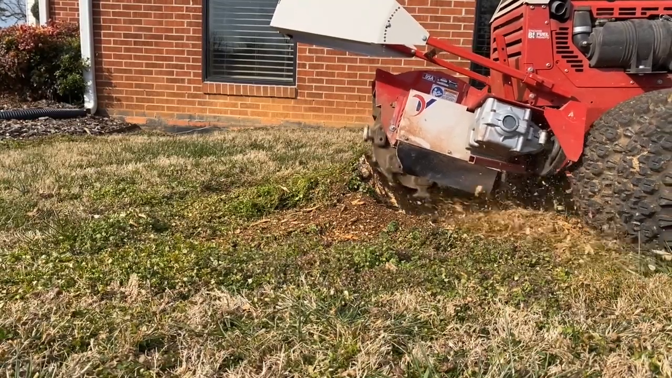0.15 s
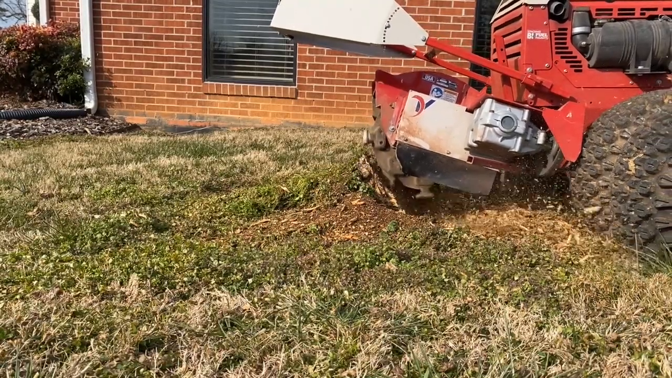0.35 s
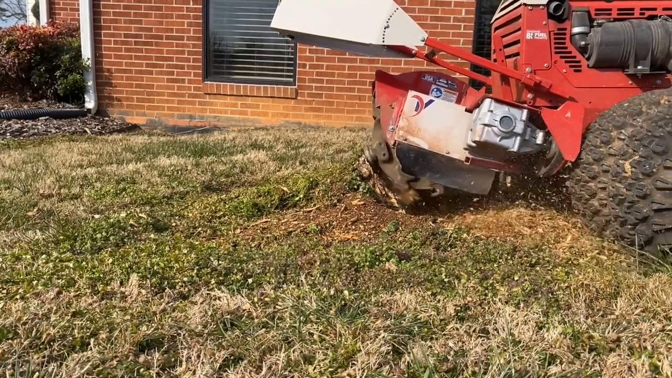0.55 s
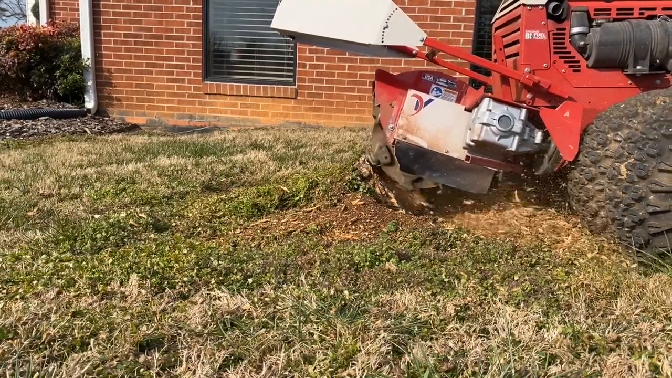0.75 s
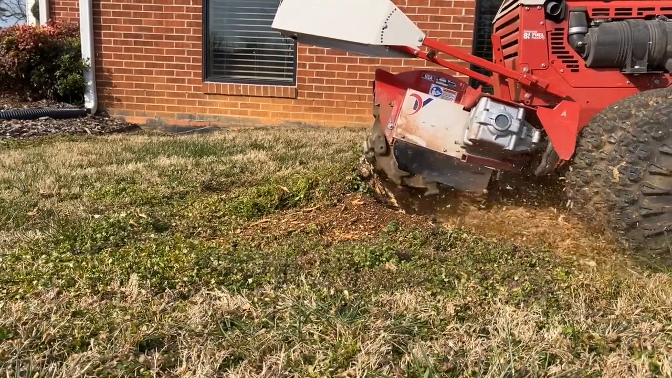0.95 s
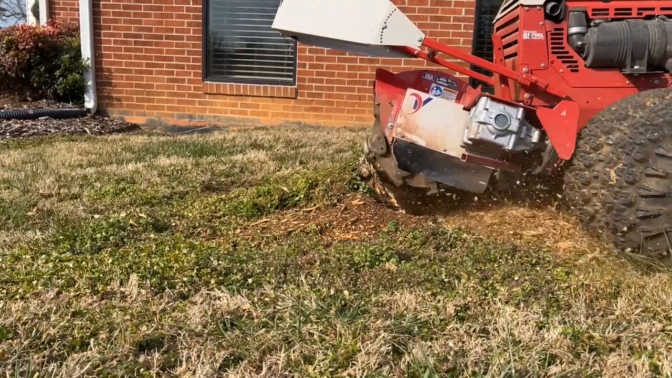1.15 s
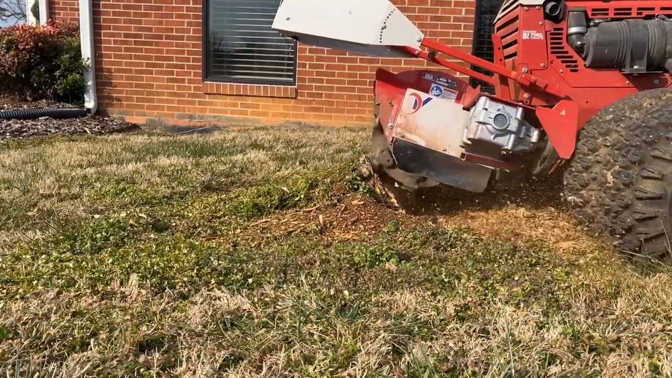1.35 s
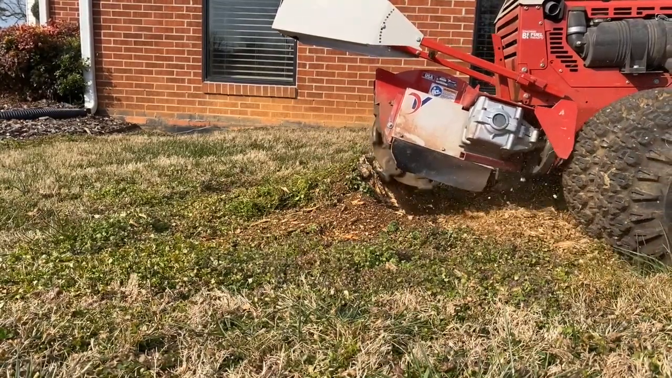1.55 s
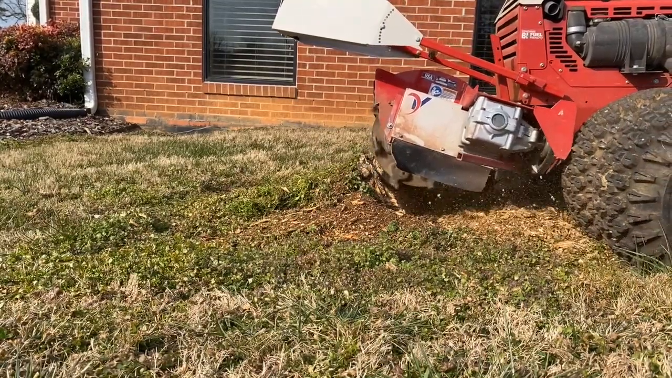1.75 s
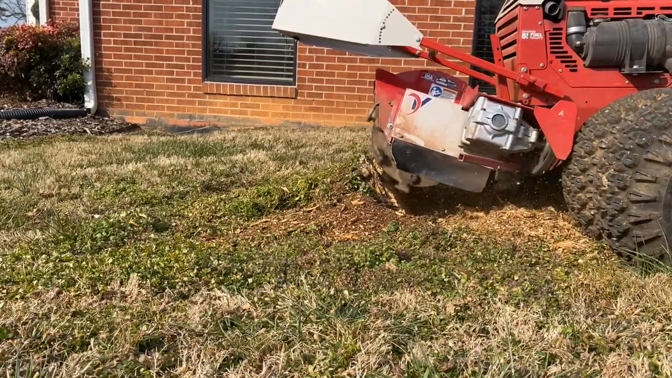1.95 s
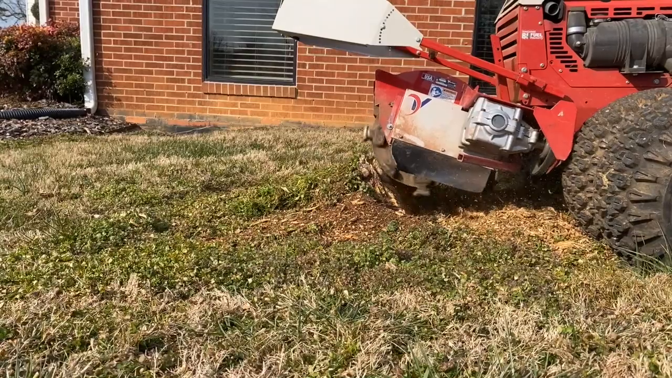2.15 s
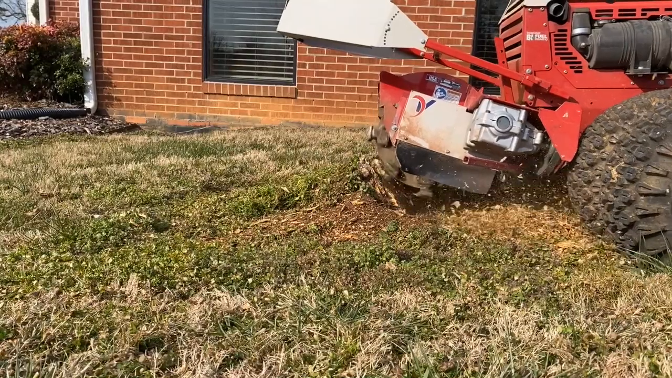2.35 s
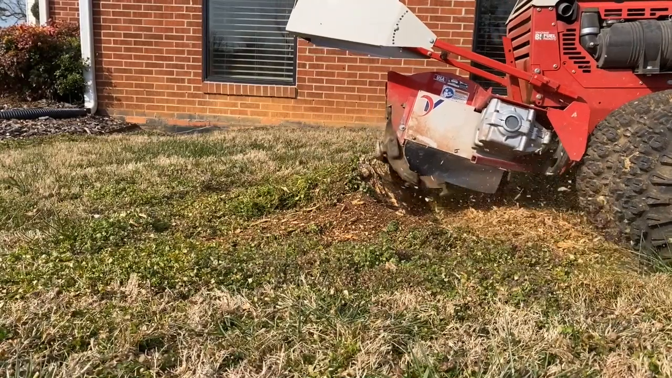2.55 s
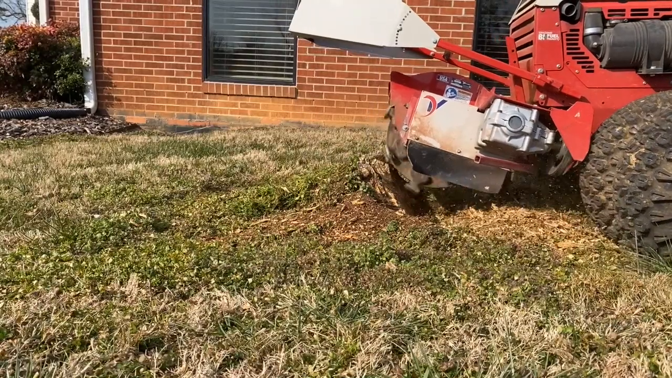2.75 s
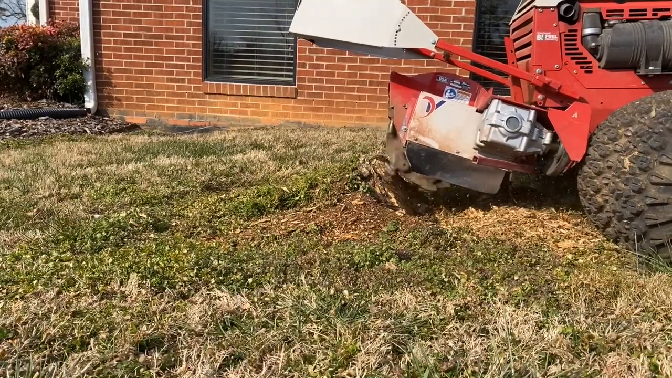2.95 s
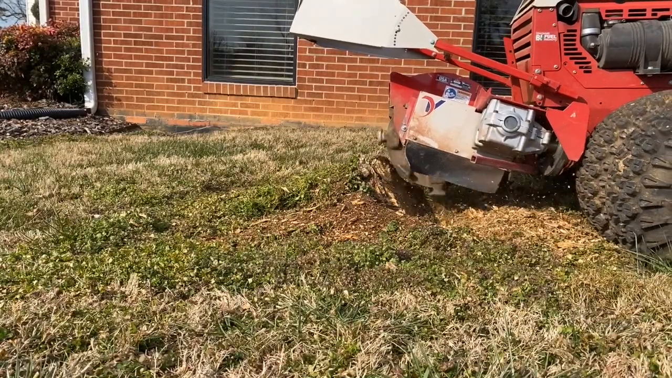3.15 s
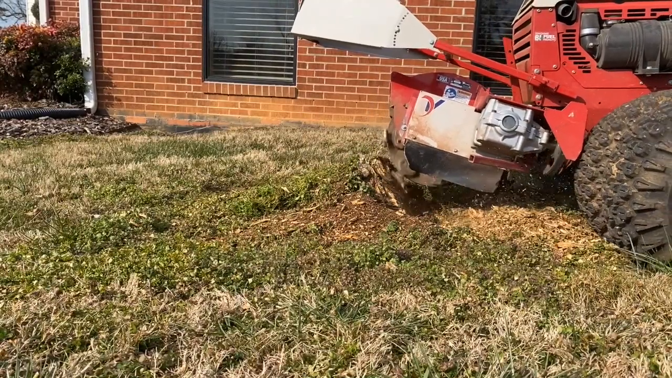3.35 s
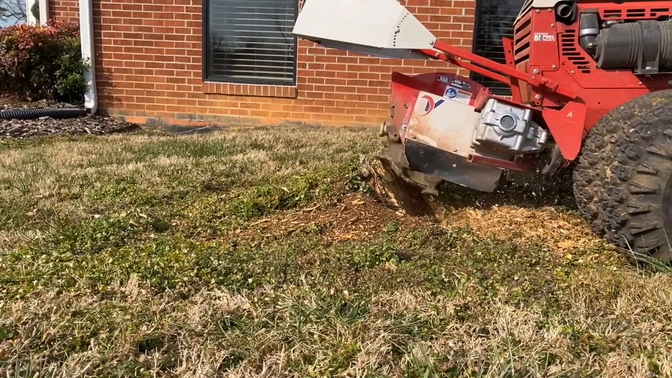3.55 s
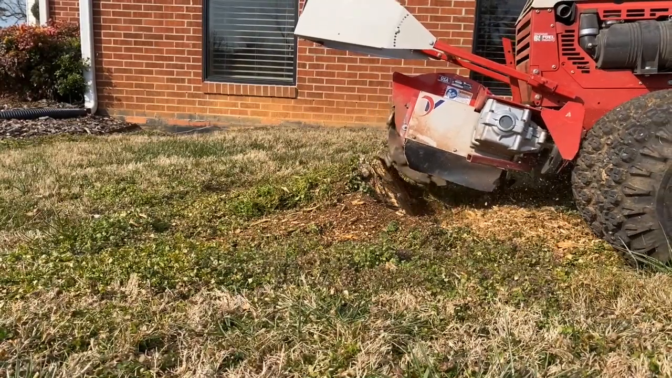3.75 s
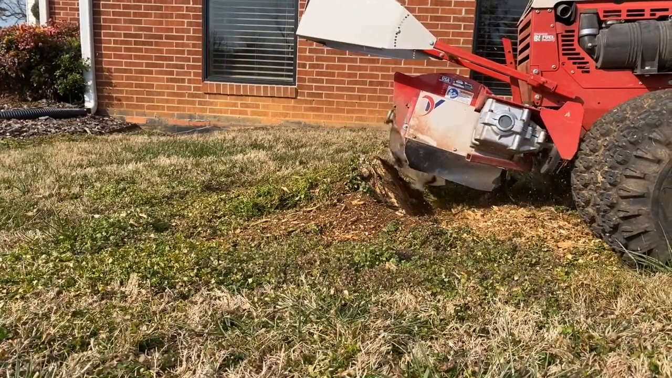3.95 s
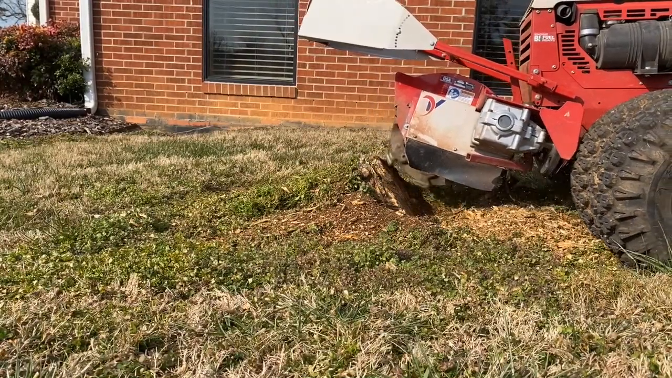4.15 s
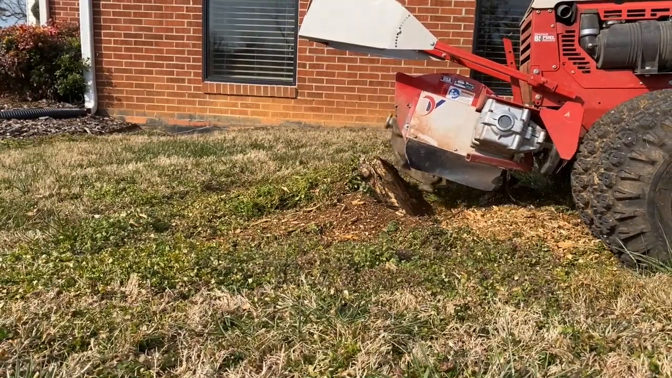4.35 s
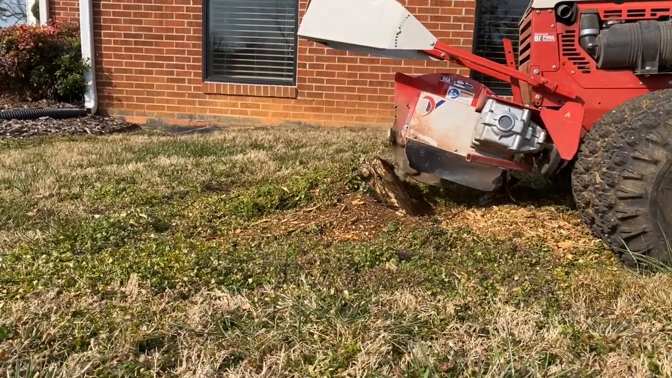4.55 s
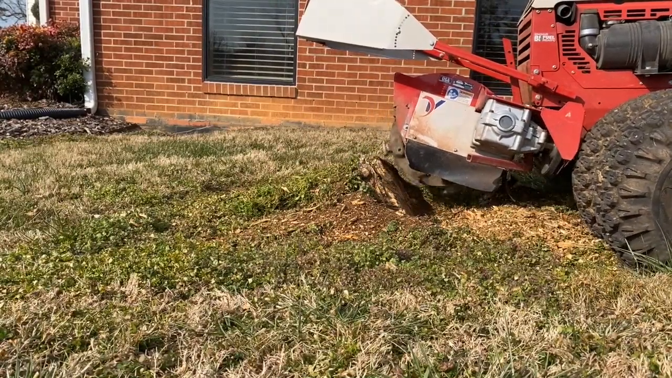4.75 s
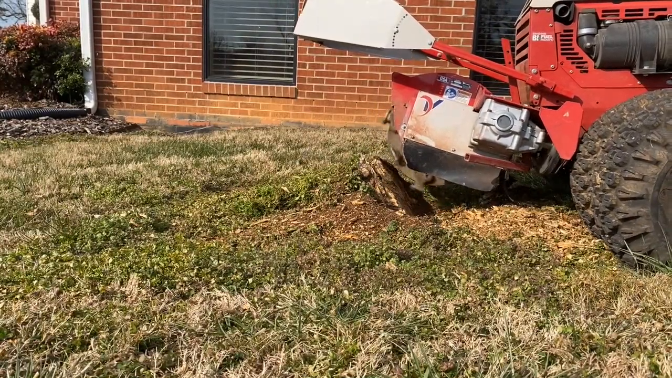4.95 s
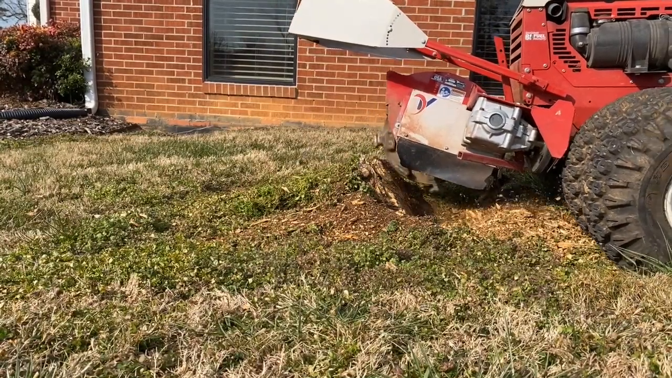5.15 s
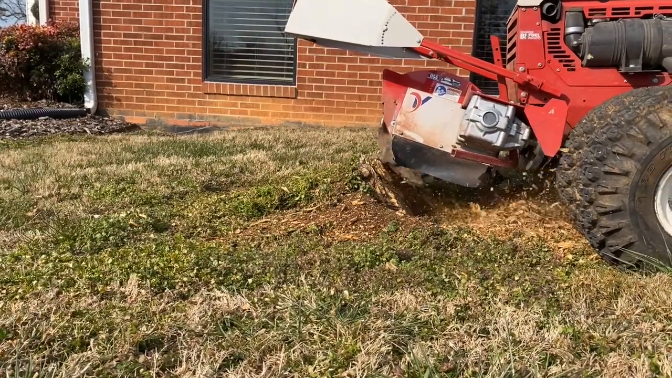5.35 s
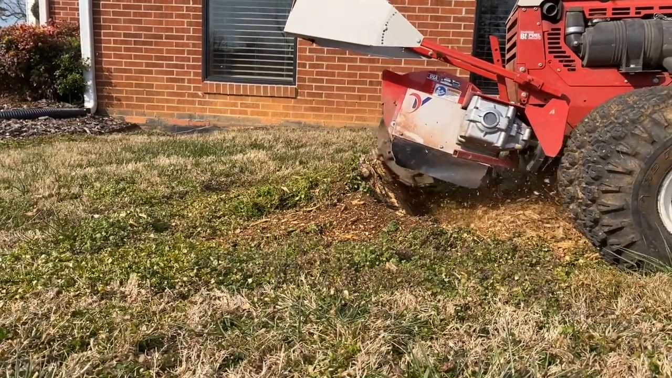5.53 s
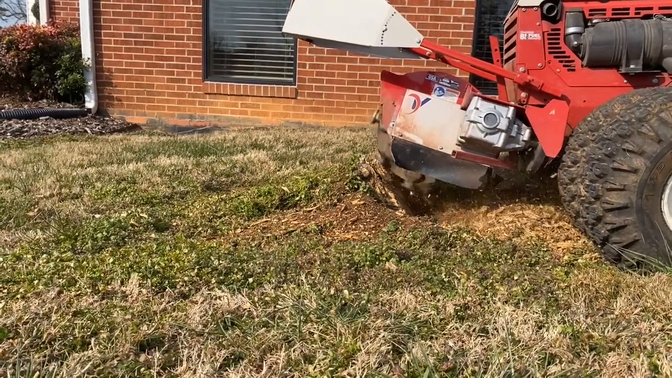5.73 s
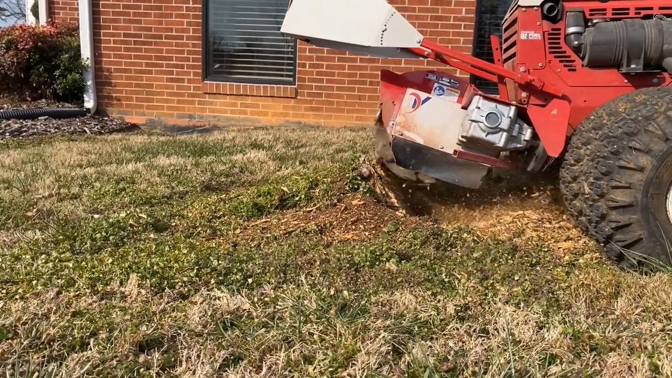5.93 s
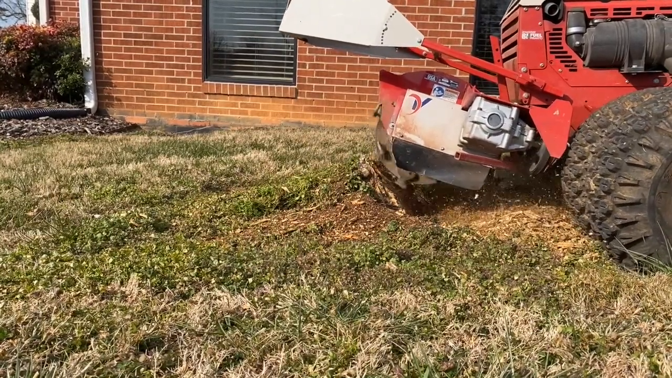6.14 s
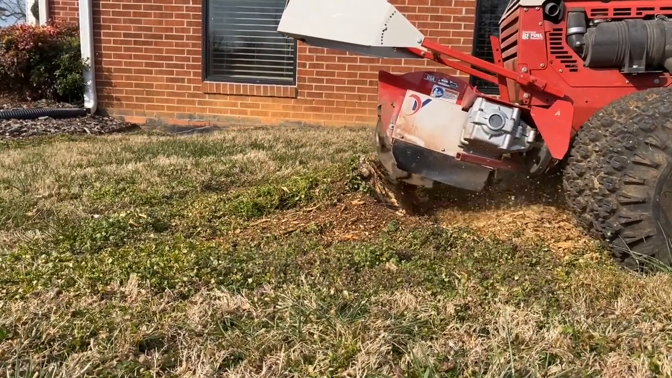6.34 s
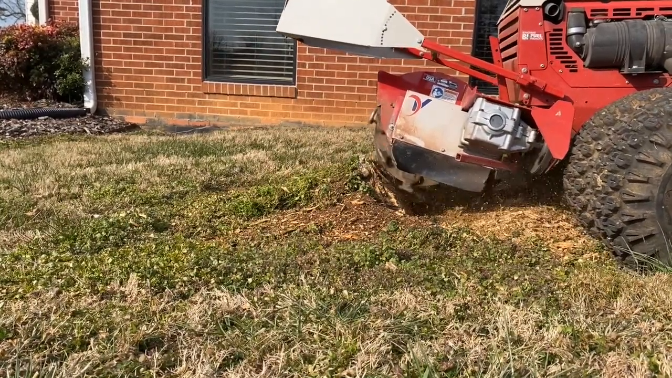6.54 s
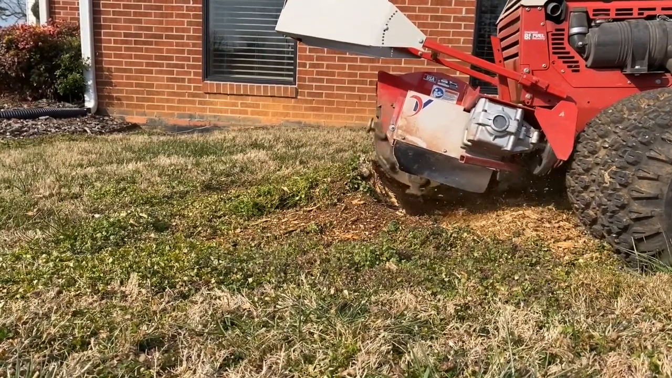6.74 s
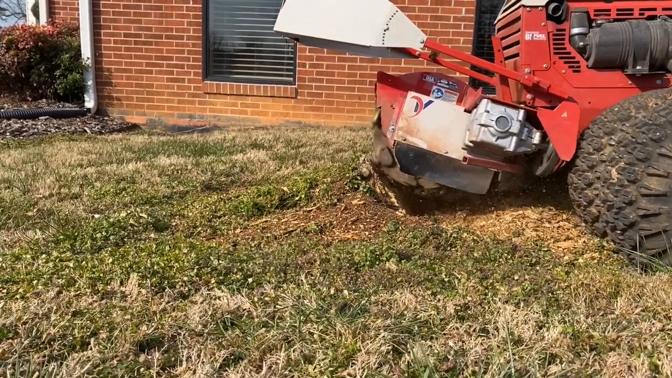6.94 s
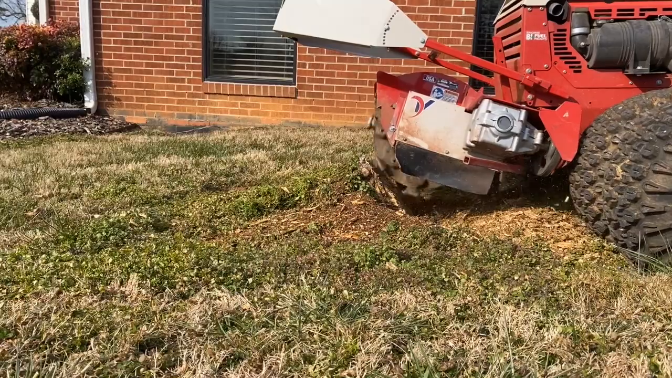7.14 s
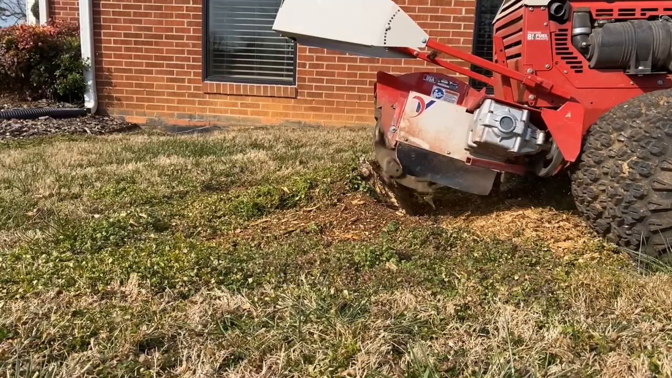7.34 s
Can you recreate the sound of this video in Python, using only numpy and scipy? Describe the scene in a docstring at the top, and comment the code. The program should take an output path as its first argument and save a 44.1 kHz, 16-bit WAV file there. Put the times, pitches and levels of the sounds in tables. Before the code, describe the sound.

From a few metres away on a lawn, a stump grinder's teeth knock, crack and squeak through wood, throwing chips over the constant drone and whine of a tractor. The grinding lightens and briefly leaves mostly engine, then a second bout brings heavy thuds as the engine sags and recovers. Light wind rumbles low on the microphone.

```python
"""Tractor-driven stump grinder.

A tractor grinds a stump on a lawn beside a brick wall. The exhaust drones at the firing rate, which
sags under load; a gear mesh whines and a pump whistles. The cutter wheel tears into wood: dull knocks,
bright tooth strikes, squeaking tooth holders, a spray of chips. Light wind rumbles on the microphone."""
import sys
import numpy as np
from scipy import signal
from scipy.fft import rfft, irfft, next_fast_len
from scipy.io import wavfile

SR = 44100
rng = np.random.default_rng(int(sys.argv[2]) if len(sys.argv) > 2 else 0)


def waveform_to_disk(signal):
    """Save audio, clipped to [-1, 1], as 16-bit WAV at the path in sys.argv[1]."""
    frames = np.transpose(np.atleast_2d(signal))
    scaled = np.clip(frames, -1, 1) * 32767
    samples = np.round(scaled).astype(np.int16)
    wavfile.write(sys.argv[1], SR, samples)


N = 330309
FFT_SIZE = next_fast_len(N + 8192)
BIN_HZ = np.maximum(np.arange(FFT_SIZE // 2 + 1) * SR / FFT_SIZE, 1)
TIME_S = np.arange(N) / SR

# engine speed: (time [s], firing rate [Hz])
FIRING_RATE_HZ = [(0, 91.95), (.15, 90.1), (.3, 90.33), (.6, 91), (.82, 90.23), (.97, 89.3), (1.12, 90.3),
                  (1.24, 91.25), (1.5, 91.2), (2.2, 91.72), (2.39, 90.2), (2.47, 90.2), (2.7, 93.3),
                  (2.97, 94.34), (3.2, 93.3), (3.65, 92.35), (4.2, 92.75), (4.45, 93.8), (4.68, 93.5),
                  (4.97, 93.7), (5.1, 93.1), (5.3, 89.2), (5.55, 87.75), (5.84, 89.2), (6.03, 88.7),
                  (6.3, 89.9), (6.45, 91.03), (6.65, 90.9), (7.05, 94.1), (7.49, 93.3)]
# exhaust orders 1-3: (order, level at nominal rate [dB], gain with sag [dB/Hz], wander [dB])
LOW_ORDERS_DB = [(1, -17.5, 0.3, 0.4), (2, -16.5, -0.3, 0.34), (3, -22, 0.58, 1.0)]
# exhaust orders 4-8: (order, level re order 3 [dB])
UPPER_ORDERS_DB = [(4, -6), (5, -8.5), (6, -13.5), (7, -19.5), (8, -26)]
# cutting effort: (time [s], knocking [dB], tearing [dB], chip spray [dB])
CUT_DB = [(0.0, -24.5, -28.5, -37), (0.35, -24.5, -29.5, -38), (0.62, -15, -24, -35),
          (0.8, -20.5, -28.5, -35), (1.2, -23, -29, -40), (1.42, -21.5, -29, -39), (1.5, -16, -24, -32.5),
          (1.75, -15.5, -23.5, -33.5), (2.1, -16.5, -27, -39), (2.24, -21, -26.5, -39),
          (2.38, -23, -30, -39), (2.6, -28, -36.5, -44.5), (3.02, -25.5, -37.5, -42),
          (3.12, -25.5, -33.5, -35), (3.5, -24.5, -32, -39), (4.0, -26, -35, -45), (4.5, -27, -40, -52),
          (4.95, -25.5, -35.5, -42), (5.2, -21.5, -26.5, -36.5), (5.6, -24.5, -29.5, -47),
          (5.75, -14.5, -27, -33), (5.92, -26, -26.5, -40), (6.08, -22.5, -32, -42), (6.5, -19, -28.5, -37),
          (6.66, -22.5, -30.5, -34.5), (6.82, -26, -35.5, -42), (7.49, -26, -36, -39)]
# deeper bites of the wheel: (time [s], boost [dB], length [s])
BITES_DB = [(0.037, 7, 0.036), (0.19, 4, .03), (0.52, 0, .05), (0.616, -1.5, 0.061), (0.926, 4, 0.047),
            (1.318, 6, .06), (1.492, 3.5, 0.046), (1.57, 6, 0.055), (1.607, 0, .04), (1.924, 0.5, 0.041),
            (2.045, 2, 0.049), (2.16, 1, 0.07), (3.46, 5, 0.067), (4.189, 5, 0.049), (5.13, 0, 0.026),
            (5.261, 8.5, 0.042), (5.367, 3, 0.027), (5.49, 12, 0.032), (5.538, 9, .05), (5.67, 0, 0.043),
            (5.777, 2, 0.044), (5.888, 12.5, 0.07), (6.242, 2, 0.11), (6.574, 3, .04), (6.858, -1, 0.035)]
# heavy blows on the stump: (time [s], peak [dB])
BLOWS_DB = [(0.595, -3), (0.759, -11), (1.146, -11), (1.495, -14), (1.563, -6), (1.63, -24), (1.908, -27),
            (2.035, -22), (3.655, -21), (3.719, -24), (5.223, -14), (5.255, -4.5), (5.314, -6.5),
            (5.359, -8), (5.483, -19), (5.706, -19), (5.832, -2), (5.884, -3), (5.932, 0), (6.567, -8)]
# wood and soil modes: (frequency [Hz], first-stage width [Hz], gain [dB])
STUMP_MODES_HZ = [(244.8, 67, -1.5), (333, 38, 2), (411, 171, -3), (495, 81, 0), (595, 270, -12.5),
                  (794, 36, -15.5)]
# fibre, chip and strike spectra: (frequency [Hz], relative density [dB])
TEAR_SPECTRUM_DB = [(500, -4.5), (900, -3.5), (1300, -6.5), (1800, -1), (2500, -4), (3500, -6.5),
                    (4500, -15), (6000, -24)]
SPRAY_SPECTRUM_DB = [(2500, -37), (4000, -2.5), (5000, 0), (6500, -1), (8500, 2), (11000, -5.5),
                     (13500, -11), (16000, -23)]
STRIKE_SPECTRUM_DB = [(600, -15), (1500, -8), (2500, 0), (4000, 2.5), (6000, 0.5), (9000, 2.5), (12000, -5),
                      (16000, -11.5)]
# tooth strikes: (time [s], level [dB], dullness [0-1])
STRIKES_DB = [(.0195, -16, 0.5), (0.036, -11.5, 0.4), (.1032, -12.5, 0.4), (.1635, -15, .25),
              (.182, -10.5, 0.35), (0.2413, -14, 0.55), (0.2497, -20, 0.2), (.3057, -20, .3),
              (0.318, -17, .3), (.3732, -16, .5), (.4514, -19, 0.49), (0.515, -18, .44), (.6414, -19, .43),
              (0.7722, -9.5, 0.48), (.84, -13.5, 0.5), (.8996, -10, 0.52), (.9661, -12.5, 0.47),
              (1.03, -13.5, 0.42), (1.0969, -16, 0.57), (1.1498, -22, 0.2), (1.2157, -13.5, 0.42),
              (1.281, -10.5, 0.27), (1.349, -21, 1), (1.4122, -18, 0.5), (1.5304, -30, 0.8),
              (1.5648, -30, 0), (1.9686, -25, .23), (2.1974, -20, .3), (2.2303, -21, .3),
              (2.2852, -13.5, 0.37), (2.3052, -18.5, 0), (2.352, -18.5, 0.1), (2.368, -11.5, 0.26),
              (2.4337, -12, .08), (2.4847, -29, 0), (2.5, -16, 0.13), (3.065, -23, 0.24),
              (3.1295, -20, 0.45), (3.2417, -29, 0.1), (3.3054, -30, .34), (3.71, -22, 0.3),
              (3.7423, -21, 0.2), (4.987, -22, 0.2), (5.05, -23, 0), (5.0828, -24, 0.24),
              (5.1148, -17, 0.2), (5.1475, -18, 0.4), (5.1812, -11.5, 0.42), (5.2315, -19, .13),
              (5.2502, -14, 0.3), (5.2869, -23, 0.2), (5.3216, -18, .32), (5.3392, -12, 0.5),
              (5.359, -18, 0.55), (5.394, -14, 0.31), (5.4308, -14, 0.46), (5.468, -11.5, 0.3),
              (5.5056, -8, 0.53), (5.6157, -22, 0.1), (5.6318, -13.5, 0.44), (5.691, -16, .51),
              (5.7007, -16.5, 0.24), (5.7364, -21, 0.1), (5.753, -17, .3), (5.7699, -17.5, 0.4),
              (5.821, -9, 0.56), (5.8551, -12.5, .21), (5.907, -14, 0.05), (5.9255, -12, 0.3),
              (5.9618, -21, 0.3), (6.049, -17.5, 0.46), (6.0695, -20, .3), (6.2386, -21, 0.4),
              (6.3104, -20, 0.2), (6.5915, -17.5, 0.4)]
# tooth holder and guard plate notes: (time [s], peak [dB], pitch [Hz])
HOLDER_PINGS_DB = [(0.035, -23, 3640), (0.105, -22, 3530), (0.171, -23, 3600.0), (0.241, -25, 3580.0),
                   (0.259, -22, 3390.0), (0.321, -27, 3370.0), (0.39, -22, 3400.0), (0.453, -20.5, 3420),
                   (0.519, -23, 3580), (0.589, -21, 3380), (0.702, -30, 3640), (0.774, -26, 3600),
                   (0.78, -34, 3460.0), (0.84, -30, 3610.0), (0.908, -16.5, 3550), (0.975, -20, 3600.0),
                   (1.04, -18.5, 3583), (1.091, -23, 3380.0), (1.105, -28, 3610), (1.154, -29, 3550.0),
                   (1.159, -23.5, 3340.0), (1.222, -25, 3300.0), (1.227, -33, 3690.0), (1.278, -31, 3590),
                   (1.288, -24, 3352), (1.355, -27, 3408), (1.409, -33, 3580.0), (1.433, -32, 3616),
                   (2.304, -23, 3534), (2.366, -26, 3570.0), (2.416, -30, 3680.0), (3.051, -30, 3420),
                   (3.065, -24.5, 3630), (3.128, -26, 3582), (3.177, -22, 3400), (3.192, -32, 3590),
                   (3.243, -25, 3394), (3.257, -25, 3590), (3.305, -24.5, 3410), (3.321, -33, 3605),
                   (3.37, -27, 3350.0), (3.387, -29, 3590), (3.435, -23, 3340), (3.452, -25, 3570),
                   (3.467, -23.5, 3310), (3.5, -27, 3330), (3.515, -22.5, 3575), (3.563, -26, 3337),
                   (3.58, -25, 3580.0), (3.708, -20, 3550), (3.76, -26, 3352), (3.774, -19, 3582),
                   (3.838, -27, 3526), (3.902, -29, 3556), (4.92, -29, 3580.0), (5.014, -30, 3290.0),
                   (5.065, -24, 3424), (5.098, -26, 3375), (5.113, -33, 3646), (5.165, -23, 3370.0),
                   (5.233, -26, 3380), (5.249, -20, 3620.0), (5.322, -27, 3610.0), (5.339, -28, 3442),
                   (5.41, -24, 3530.0), (5.47, -22.5, 3640), (5.592, -30, 3560.0), (5.617, -22, 3570.0),
                   (5.634, -25, 3410.0), (5.669, -23, 3340), (5.703, -20, 3400.0), (5.737, -22, 3397),
                   (5.752, -27, 3570), (5.767, -20, 3547), (5.806, -28, 3370.0), (5.818, -27, 3630),
                   (5.892, -27, 3633), (5.909, -19, 3414), (5.961, -23, 3550), (5.98, -23, 3424),
                   (6.052, -21, 3410.0), (6.119, -19.5, 3420.0), (6.172, -18, 3556), (6.239, -21, 3548),
                   (6.256, -22, 3380.0), (6.292, -18, 3350.0), (6.324, -15, 3400.0), (6.374, -23, 3590.0),
                   (6.392, -26, 3400.0), (6.44, -29, 3580), (6.456, -22, 3415), (6.492, -25, 3350),
                   (6.586, -21, 3365), (6.654, -27, 3354), (6.704, -28, 3630), (6.757, -28, 3312),
                   (6.902, -26, 3545), (7.228, -34, 3542)]
GUARD_PINGS_DB = [(0.172, -22, 2670), (1.5643, -28, 2403), (2.3075, -22, 2640), (2.4414, -24, 2620),
                  (2.5036, -25, 2638), (5.469, -36, 2630), (5.8206, -32, 2490), (5.9258, -21, 2800)]
# mesh tone off the casing resonance: (time [s], level [dB])
MESH_DB = [(0, -25), (.3, -30), (.7, -31), (1.3, -29), (1.6, -31), (2.1, -33), (2.3, -28.5), (2.6, -28.5),
           (3.05, -39.5), (3.35, -27.5), (3.78, -27), (3.9, -35), (4.3, -43), (4.68, -36), (5.05, -38),
           (5.24, -32), (5.32, -45), (5.95, -43), (6.3, -30.5), (6.7, -30), (7.1, -30), (7.49, -31.5)]
# gear housing modes: (frequency [Hz], stage width [Hz], level at mid cut [dB])
HOUSING_MODES_HZ = [(1446.6, 29, -40.5), (1539, 25, -37), (1634, 160, -36.5), (1777, 63, -39.5),
                    (3400, 380, -45)]
# fan, intake and valve spectrum: (frequency [Hz], relative density [dB])
ENGINE_SPECTRUM_DB = [(30, -56), (60, -2), (120, 2), (200, -15), (350, -7.5), (550, -12.5), (700, -14),
                      (1100, -9), (1600, -10), (2200, -17), (3500, -21), (5000, -26.5), (8000, -26),
                      (15000, -28.5)]
# shaft hum: (turns per firing, level [dB])
SHAFT_TONES_DB = [(1.6, -44), (5.575, -38)]
# pump whistle: (multiple of stroke rate, base level [dB])
PUMP_PARTIALS_DB = [(3.2, -49), (6, -53), (10, -52.5), (11, -56), (12, -70), (13, -48), (14, -60),
                    (15, -56), (17, -58), (19, -58)]
# pump effort, higher as the arm moves: (time [s], gain [dB])
PUMP_EFFORT_DB = [(0, -2), (.9, -13), (1.3, 12.5), (2.2, 3), (3.1, 1), (3.6, 9), (4.1, 5), (4.5, -3),
                  (6.8, 3), (7.1, 2), (7.49, 8)]
# wind rumble: (time [s], level [dB])
WIND_DB = [(0, -46), (.8, -52), (4.2, -54), (4.5, -42), (4.68, -35), (4.9, -58), (5.05, -41), (5.6, -43),
           (5.95, -38), (6.45, -45), (6.7, -37), (7.49, -42)]
# phase between sides: (frequency [Hz], left lead [rad])
LEFT_LEAD_RAD = [(0, -.1), (280, -.36), (1000, -.62), (1530, -1), (2100, -.32), (2900, .08), (4200, 0),
                 (7900, -.1)]
# bands with an extra half turn between sides: (from [Hz], to [Hz])
OPPOSED_BANDS_HZ = [(8300, 9560), (12700, 14000)]
# balance: (frequency [Hz], left over right [dB])
BALANCE_DB = [(60, .8), (150, .9), (300, .4), (600, -.6), (1200, .5), (2400, 2.8), (4400, 2.2), (7500, 0),
              (15000, 0)]
# scatter off bodywork: (frequency [Hz], gain [dB])
SCATTER_DB = [(60, -41), (300, -17), (600, -8), (1500, -5), (3000, -9), (5000, -0.5), (7000, -12),
              (9000, -22), (10500, 0), (12000, -1.5), (13300, -36), (15000, -16)]


def exhaust(firing_rad, rate_hz):
    """One smooth pulse per firing; load sag shifts the order levels, upper orders waver more."""
    nominal_hz, dispersion_rad = 92, 1.9
    levels = [(order, db + slope * (nominal_hz - rate_hz) + wander_db * drift(1.6))
              for order, db, slope, wander_db in LOW_ORDERS_DB]
    third_db = levels[-1][1]
    levels += [(order, third_db + db) for order, db in UPPER_ORDERS_DB]
    out = np.zeros(N)
    for order, db in levels:
        gain = from_db(db + 0.056 * order * drift(7.5))
        silencer_rad = dispersion_rad * order * (order - 1) / 2
        jitter_rad = 0.038 * order * drift(9.9)
        out += np.sqrt(2) * gain * np.cos(order * firing_rad + silencer_rad + jitter_rad)
    return out


def cutter_wheel(firing_rad):
    """Teeth knock the stump, tear fibre and throw chips; one wheel turn per six firings."""
    bite_db = sum(db * np.exp(-4 * ((TIME_S - at_s) / length_s) ** 2) for at_s, db, length_s in BITES_DB)
    knock_db, tear_db, spray_db = curves(CUT_DB)
    knock_db += bite_db - 0.5 * drift(7.2)
    tear_db += 0.54 * bite_db + 0.5 * drift(7.2)
    spray_db += 0.76 * bite_db + 2 * drift(7.2)
    wheel_gain = from_db(1.4 * np.cos(firing_rad / 6 + 1.0) + 0.94 * drift(53))
    tear = from_db(tear_db) * coloured(grains(per_s=5000, spread_db=1.0), TEAR_SPECTRUM_DB)
    spray = from_db(spray_db) * coloured(grains(per_s=9000, spread_db=4.5), SPRAY_SPECTRUM_DB)
    knocks = from_db(knock_db) * unit_rms(stump(grains(per_s=900, spread_db=1.0)))
    return knocks + blows() + wheel_gain * (tear + spray)


def blows():
    """Single heavy impacts thud through the stump."""
    at_s, peak_db = np.transpose(BLOWS_DB)
    impulses = np.zeros(N)
    impulses[(at_s * SR).astype(int)] = from_db(peak_db)
    unit_peak = np.max(np.abs(stump(np.arange(N) == 0)))
    return stump(impulses) / unit_peak


def stump(force):
    """Broad, dull modes of wood and soil, alternating in sign."""
    out = np.zeros(N)
    for k, (hz, width_hz, db) in enumerate(STUMP_MODES_HZ):
        mode = resonance(resonance(force + 1e-18, hz, width_hz), hz, 2 * width_hz)
        out += from_db(db) * (-1) ** k / np.sqrt(width_hz) * mode
    return out


def tooth_strikes():
    """Hard tooth contact: a sharp crack, then splinter crackle. Dull strikes last longer."""
    crack_db, crackle_db = -9, -3
    bright = coloured(grains(per_s=5000, spread_db=4.0), STRIKE_SPECTRUM_DB)
    dull = unit_rms(butterworth(bright, 2, 3500, "low"))
    cracks, crackle = np.zeros((2, N))
    for at_s, db, dullness in STRIKES_DB:
        start = round(at_s * SR)
        cracks[start + 20] = from_db(db + crack_db)
        t = np.arange(min(4000, N - start)) / SR
        span = slice(start, start + len(t))
        t60_s = 0.032 + 0.063 * dullness
        envelope = (1 - np.exp(-t / 0.00054)) * from_db(db + crackle_db - 60 * t / t60_s)
        envelope *= 1 + 1.15 * np.exp(-t / 0.0012)  # first splinters loudest
        crackle[span] += envelope * ((1 - dullness) * bright[span] + dullness * dull[span])
    return crackle + butterworth(cracks, 2, [2000, 11000], "band")


def steel_pings(events, fall_hz_per_s):
    """Rubbed steel squeaks: soft rise, rough falling note, short ring."""
    rise_s, t60_s, roughness_rad = 0.0035, 0.06, 0.45
    t = np.arange(5000) / SR
    start_cycles = rng.random(len(events))
    rough_rad = np.pad(roughness_rad * drift(120), (0, len(t)))
    sag_cycles = fall_hz_per_s * (0.5 * t - 0.008) * t  # listed pitch at 8 ms
    rise = (t / rise_s) ** 2
    envelope = rise / (1 + rise) * from_db(-60 * t / t60_s)
    envelope /= np.max(envelope)
    out = np.zeros(N + len(t))
    for (at_s, db, hz), cycles in zip(events, start_cycles):
        start = round(at_s * SR)
        span = slice(start, start + len(t))
        phase_rad = 2 * np.pi * (hz * t - sag_cycles + cycles) + rough_rad[span]
        out[span] += from_db(db) * envelope * np.sin(phase_rad)
    return out[:N]


def gears(firing_rad, rate_hz):
    """Fluttering mesh tone and octave, louder at a casing resonance; the housing rattles with the cut."""
    contacts_per_firing, mid_cut_db = 17.01, -32.5
    casing_hz, half_width_hz, casing_db = 1533, 8.6, 7
    singing_db = casing_db / (1 + ((contacts_per_firing * rate_hz - casing_hz) / half_width_hz) ** 2)
    load_db = curves(CUT_DB)[1] - mid_cut_db
    tone_db = curves(MESH_DB)[0] + singing_db + 0.96 * drift(5)
    octave_db = -44 + 0.83 * load_db + 0.27 * singing_db + 1.5 * drift(4)
    mesh_rad = contacts_per_firing * firing_rad + 0.18 * drift(15) + 0.1 * drift(38)
    flutter = from_db(1.5 * drift(20) + 1.5 * np.cos(firing_rad / 3))
    tone = from_db(tone_db) * np.cos(mesh_rad)
    octave = from_db(octave_db) * np.cos(2 * mesh_rad + 0.5 * drift(40))
    out = np.sqrt(2) * flutter * (tone + octave)
    rattle = rng.standard_normal(N)
    for hz, width_hz, db in HOUSING_MODES_HZ:
        mode = unit_rms(resonance(resonance(rattle, hz, width_hz), hz, width_hz))
        out += from_db(db + 0.53 * load_db + 1.15 * drift(2.7)) * mode
    return out


def engine_noise(firing_rad, level_db):
    """Fan, intake and valve noise, pulsing with each firing."""
    puff = 1 + 0.074 * np.cos(firing_rad)
    return from_db(level_db) * puff * coloured(rng.standard_normal(N), ENGINE_SPECTRUM_DB)


def shafts(firing_rad):
    """Shafts geared off the crank hum between the exhaust orders."""
    out = np.zeros(N)
    for ratio, db in SHAFT_TONES_DB:
        gain = from_db(db + 1.4 * drift(11))
        out += np.sqrt(2) * gain * np.cos(ratio * firing_rad + 0.22 * drift(6))
    return out


def pump(firing_rad):
    """Belt-driven pump: thin high partials come and go; the belt slips a little."""
    strokes_per_firing, slip_hz = 8.01, drift(0.5)
    stroke_rad = strokes_per_firing * firing_rad + 2 * np.pi * np.cumsum(slip_hz) / SR
    whistle = sum(from_db(db + 2.5 * drift(2.5)) * np.cos(multiple * stroke_rad + 1.6 * drift(20))
                  for multiple, db in PUMP_PARTIALS_DB)
    return from_db(curves(PUMP_EFFORT_DB)[0]) * whistle


def wind(gust_db):
    """Gusty low rumble on the microphone, partly shared by both sides."""
    rumble = butterworth(rng.standard_normal((3, N)), 3, [42, 72], "band")
    gain = from_db(curves(WIND_DB)[0] + gust_db * drift(2.8))
    return gain * unit_rms(rumble[0] + 0.6 * rumble[1:])


def stereo_paths(x, scatter_t60_s):
    """Direct sound, offset in phase and level between sides, plus scatter off shaking bodywork."""
    lead_rad = np.interp(BIN_HZ, *np.transpose(LEFT_LEAD_RAD))
    for low_hz, high_hz in OPPOSED_BANDS_HZ:
        corners_hz = [low_hz - 250, low_hz, high_hz, high_hz + 600]
        lead_rad -= np.interp(BIN_HZ, corners_hz, [0, np.pi, np.pi, 2 * np.pi])
    left = np.sqrt(bin_gains(BALANCE_DB)) * np.exp(0.5j * lead_rad)
    spectrum = rfft(x, FFT_SIZE)
    direct = irfft(spectrum * np.array([left, 1 / left]), FFT_SIZE)[:, :N]
    t = np.arange(6000) / SR
    echoes = rng.standard_normal((2, len(t))) * from_db(-60 * t / scatter_t60_s)
    echoes /= np.sqrt(np.sum(echoes ** 2, axis=1, keepdims=True))
    scatter = irfft(spectrum * rfft(echoes, FFT_SIZE) * bin_gains(SCATTER_DB), FFT_SIZE)[:, :N]
    return direct + scatter * [drift(18.3), drift(26.3)]


def from_db(db):
    """Decibels to gain."""
    return 10 ** (np.asarray(db) / 20)


def unit_rms(x):
    """Scale to rms 1."""
    return x / np.sqrt(np.mean(x ** 2) + 1e-20)


def curves(table):
    """Each value column of a time table, per sample."""
    at_s, *columns = np.transpose(table)
    return [np.interp(TIME_S, at_s, column) for column in columns]


def bin_gains(spectrum_db):
    """Gain per FFT bin, interpolated in dB over log frequency."""
    hz, db = np.transpose(spectrum_db)
    return from_db(np.interp(np.log(BIN_HZ), np.log(hz), db))


def coloured(x, spectrum_db):
    """Filter by a spectrum table; rms 1."""
    return unit_rms(irfft(rfft(x, FFT_SIZE) * bin_gains(spectrum_db), FFT_SIZE)[:N])


def drift(rate_hz):
    """Smooth random wander, rolling off above rate_hz; rms 1."""
    hop, warm_up = 40, 2000
    pole = np.exp(-2 * np.pi * rate_hz * hop / SR)
    noise = rng.standard_normal(N // hop + warm_up + 2)
    slow = signal.lfilter([1], [1, -2 * pole, pole * pole], noise)[warm_up:]
    return np.interp(np.arange(N) / hop, np.arange(len(slow)), unit_rms(slow))


def resonance(x, hz, width_hz):
    """Two-pole band-pass, peak gain 1."""
    radius = np.exp(-np.pi * width_hz / SR)
    gain = (1 - radius ** 2) / 2
    feedback = [1, -2 * radius * np.cos(2 * np.pi * hz / SR), radius ** 2]
    return signal.lfilter([gain, 0, -gain], feedback, x)


def butterworth(x, order, edges_hz, kind):
    """Filter with a flat passband."""
    return signal.sosfilt(signal.butter(order, edges_hz, kind, fs=SR, output="sos"), x)


def grains(per_s, spread_db):
    """Random clicks of uneven size and sign."""
    sizes = from_db(spread_db * np.minimum(rng.exponential(1, N), 4)) * rng.choice([-1, 1], N)
    return sizes * (rng.random(N) < per_s / SR) + 1e-18


def scene():
    """Tractor and cutter from a few metres, in light wind."""
    rate_hz = curves(FIRING_RATE_HZ)[0]
    firing_rad = 2 * np.pi * np.cumsum(rate_hz) / SR
    tractor = exhaust(firing_rad, rate_hz) + gears(firing_rad, rate_hz)
    tractor += shafts(firing_rad) + pump(firing_rad) + engine_noise(firing_rad, level_db=-31.5)
    cutter = cutter_wheel(firing_rad) + tooth_strikes()
    cutter += steel_pings(HOLDER_PINGS_DB, fall_hz_per_s=4750)
    cutter += steel_pings(GUARD_PINGS_DB, fall_hz_per_s=1500)
    return stereo_paths(tractor + cutter, scatter_t60_s=0.072) + wind(gust_db=2.5)


def record(dry):
    """Soft peak rounding, then a steep low-pass."""
    stop_hz = 16400
    rounded = 1.332 * np.tanh(dry / 1.683)
    return signal.sosfilt(signal.cheby2(16, 80, stop_hz, fs=SR, output="sos"), rounded)


dry = scene()
out = record(dry)
waveform_to_disk(out)
```